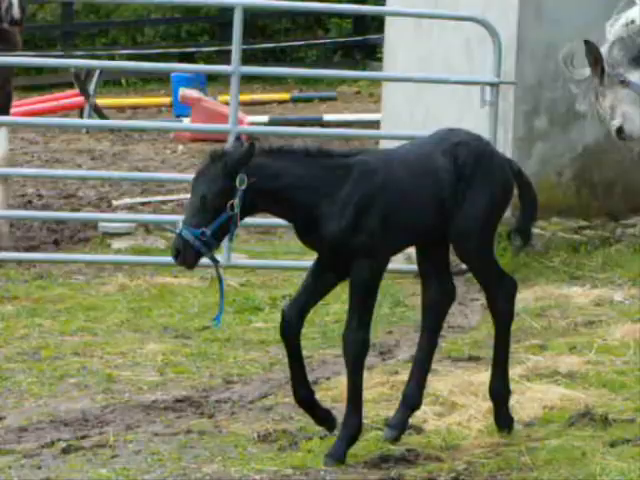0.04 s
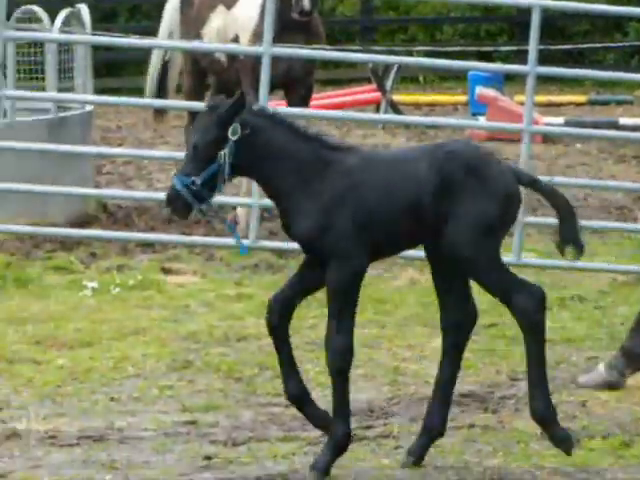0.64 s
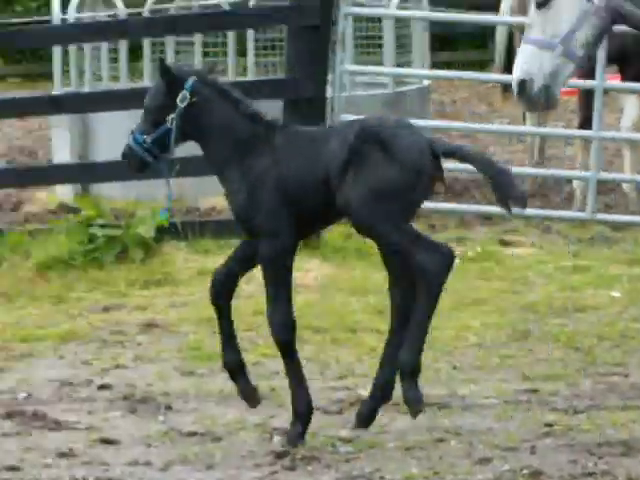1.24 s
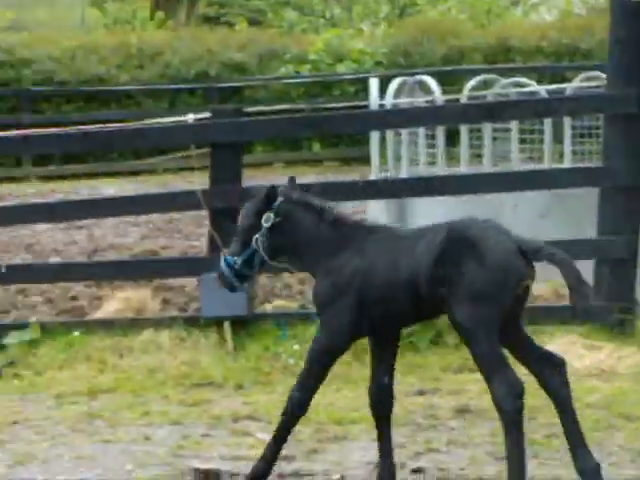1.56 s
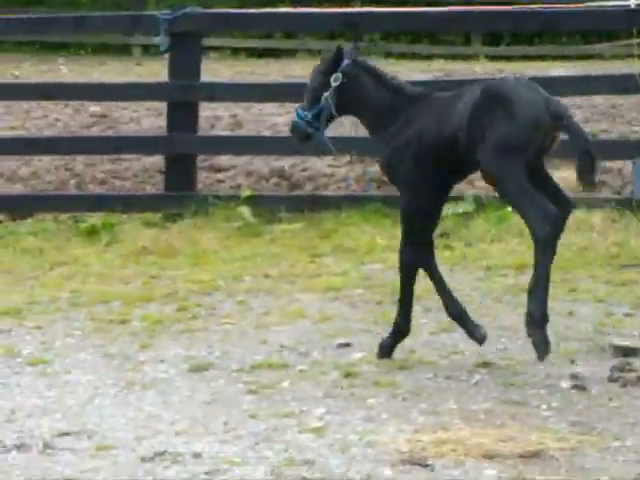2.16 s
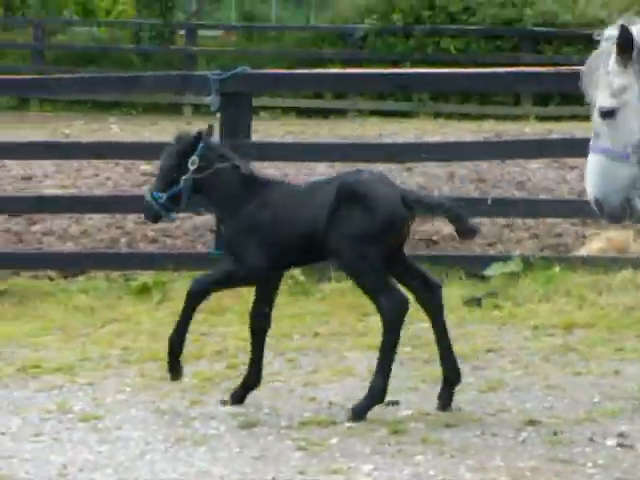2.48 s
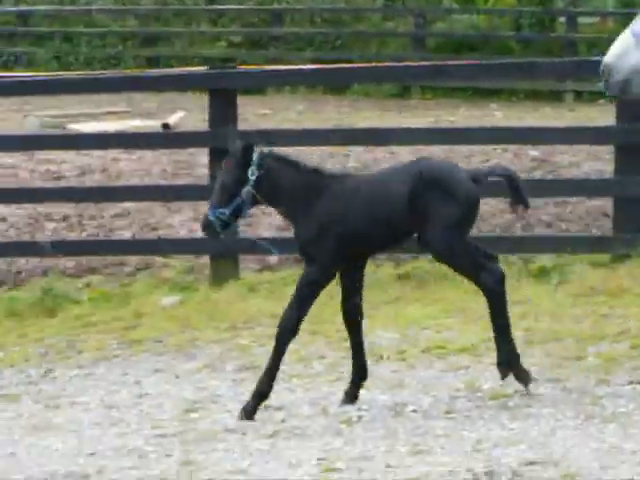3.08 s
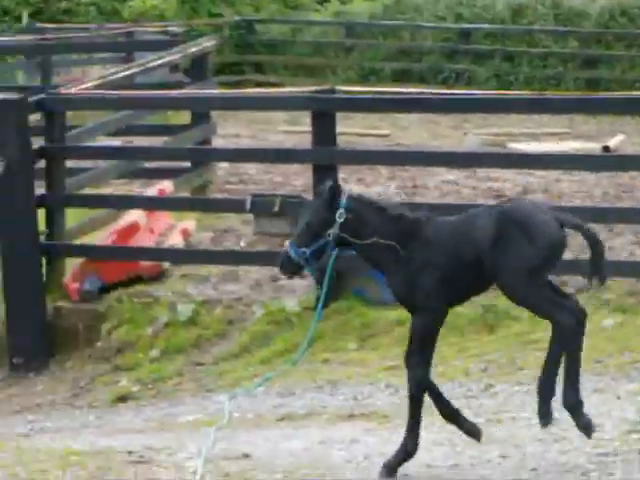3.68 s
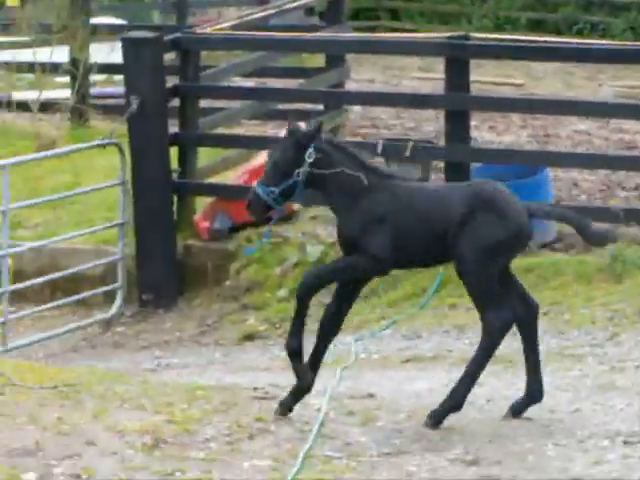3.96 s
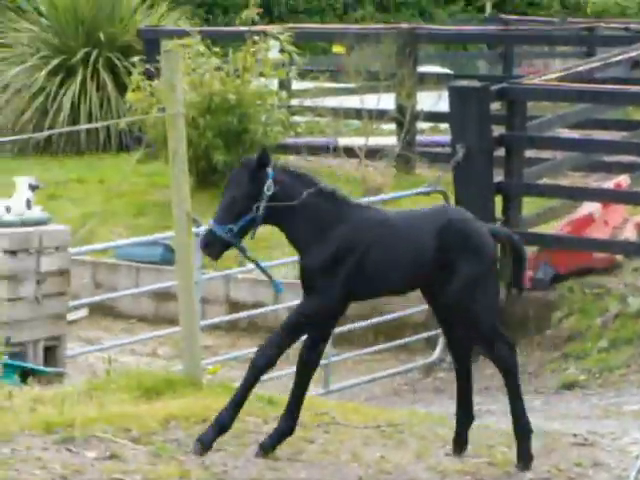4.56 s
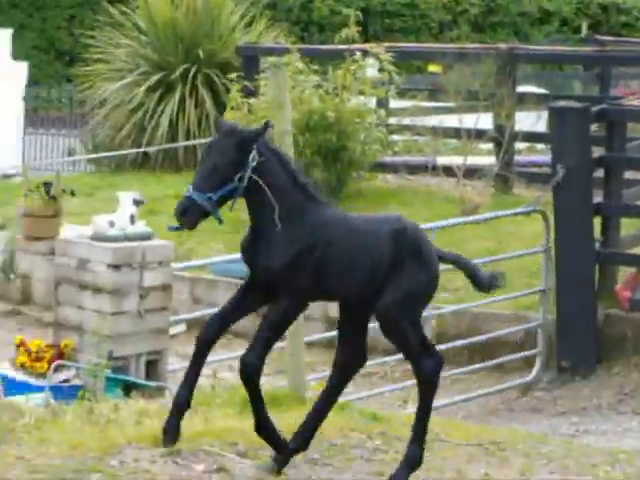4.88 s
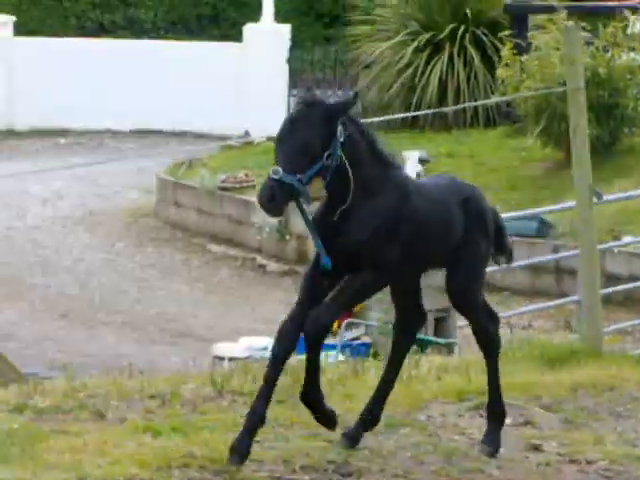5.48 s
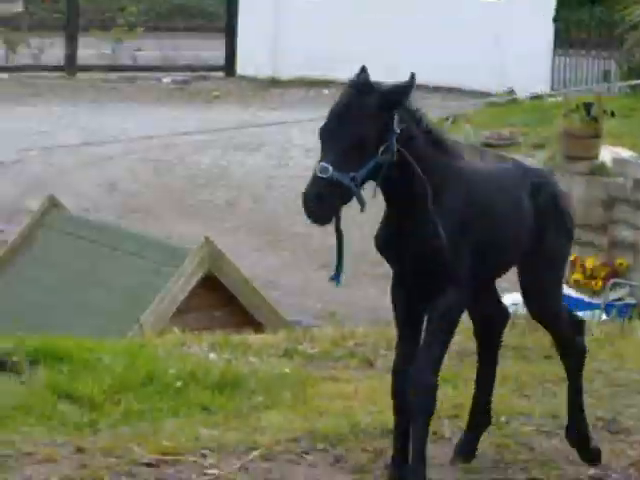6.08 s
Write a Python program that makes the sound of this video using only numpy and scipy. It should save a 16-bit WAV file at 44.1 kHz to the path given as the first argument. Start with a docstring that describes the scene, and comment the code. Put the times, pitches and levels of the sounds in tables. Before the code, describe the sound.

A foal's light, uneven hoof knocks on gravel under steady outdoor hiss, with sharp microphone handling clicks early and three faint bird chirps late.

```python
"""A foal in a gravel yard

A foal trots and canters on earth and gravel: its hooves knock, scuff and kick pebbles.
Behind it are a steady outdoor hiss and soft low rumbles; a small bird calls three times near the end.
We hear it through a small hand-held camera, which pops as it starts, clicks under the fingers,
whines faintly and samples coarsely. A fine treble fizz rises and falls with the sound."""
import sys
import numpy as np
from scipy import signal
from scipy.fft import rfft, irfft
from scipy.io import wavfile

SR = 44100
rng = np.random.default_rng(int(sys.argv[2]) if len(sys.argv) > 2 else 0)


def inscribe(sig):
    """Save sig as 16-bit PCM at rate SR to the path in sys.argv[1].

    A 1-D sig is mono; a 2-D sig holds one channel per row.
    Samples are clipped to [-1, 1] before scaling.
    """
    pcm = np.round(np.clip(np.atleast_2d(sig).T, -1, 1) * 32767)
    wavfile.write(sys.argv[1], SR, pcm.astype(np.int16))


N = 279594
TIME = np.arange(N) / SR
HOLD = 4   # the camera holds each value for this many samples

# the tone of the outdoor air, from bass to treble: f/Hz, relative level/dB
AIR_SPECTRUM = [(15, -33.5), (25, -4.5), (49, -5.5), (92, -2), (144, -1), (303, -4), (389, -4), (416, -5.5),
                (445, -5.5), (533, -5), (816, -1.5), (1280, -4), (1830, -5), (5050, -7), (5400, -7),
                (7020, -50), (11900, -120)]
# low rumbles on the microphone, from handling the camera or light wind:
# middle t/s, half length/s, level/dB, top f/Hz
LOW_RUMBLES = [(.77, .075, -37, 78), (.96, .12, -43.5, 60), (3.05, .3, -47, 45), (4.46, .08, -51, 45),
               (5.03, .12, -46, 45), (5.28, .06, -40, 45), (6.32, .07, -41, 70)]
# the notes at which the camera's plastic shell rings: f/Hz, level/dB, time to fade by 60 dB/s
SHELL_NOTES = [(1080, -26, 0.049), (1540, -16.5, .024), (1835, -20.5, 0.045), (2190, -2, 0.015),
               (2884, 2.5, 0.00597), (3220, -12, 0.0073), (4560, -14, 0.0028)]
# fingers on the camera: t/s, level/dB, ring length/times the shell's own, relative push level/dB
FINGER_TAPS = [(0.6368, -8.5, 0.83, -4.5), (0.6369, -11, 0.38, 6.5), (0.6381, 1.5, 0.943, -22),
               (0.6831, -15, 0.88, -3.5), (.6845, -26, 1.1, -22), (0.7151, -23, .6, -20),
               (3.1277, -27, .5, -20), (3.1452, -18, .8, -18)]
# bird calls: t/s, level/dB, hold/s, length/s, first f/Hz, last f/Hz, time to mid-slide/s, rasp/Hz
BIRD_CALLS = [(5.305, -32, .036, .14, 4970, 4890, .038, 210), (5.731, -33, .016, .09, 4260, 4800, .06, 360),
              (5.921, -29.5, .018, .16, 4240, 3230, .038, 50)]
# single pebbles clinking: t/s, level/dB, f/Hz
PEBBLE_CLINKS = [(2.875, -28, 3920), (3.145, -18, 3100), (3.385, -30.5, 3920), (6.264, -23, 5400),
                 (6.283, -25, 5400)]
# brief rubs, of a hoof through grit or a finger on the camera: t/s, length/s, level/dB, rough f/Hz
RUBS = [(0.315, 0.1024, -35.5, 2190), (0.703, .03, -34, 3600), (0.729, 0.11, -34.5, 3400),
        (1.893, 0.067, -42, 1500), (2.675, 0.045, -36, 1300), (2.861, 0.023, -36, 3800),
        (3.115, 0.057, -33.5, 2400), (3.38, 0.034, -35, 3800), (3.979, 0.19, -36, 1330),
        (4.305, 0.052, -36, 1190), (5.167, 0.061, -40, 1500), (5.937, 0.053, -35.5, 1300)]
# hooves landing: t/s, level/dB, knock f/Hz, relative gravel level/dB
HOOF_FALLS = [(1.509, -27, 1300, -9), (1.533, -17, 790, -14), (1.911, -22.5, 850, -9.5),
              (2.282, -32, 1400, -1), (2.674, -15, 770, -16), (2.683, -22.5, 760, -14),
              (3.097, -26.5, 950, -8), (3.287, -18, 790, -28), (3.553, -18.5, 880, -9),
              (3.992, -21.5, 1130, -14), (4.321, -25.5, 1090, -15), (4.807, -19, 1085, -11.5),
              (4.953, -23.5, 1075, -6), (5.166, -26, 940, -7.5), (5.194, -19, 1100, -8),
              (5.578, -24.5, 633, -8), (5.965, -19, 882, -10), (6.266, -20, 647, -8.5)]


def from_db(db):
    """Turn decibels into a number to multiply by."""
    return 10 ** (np.asarray(db) / 20)


def rms_one(x):
    """Scale a sound so that its average strength (rms) is 1."""
    return x / np.sqrt(np.mean(x ** 2) + 1e-20)


def keep_range(x, hz, kind, order=2):
    """Keep what lies below a frequency ("low") or between two ("band")."""
    return signal.sosfilt(signal.butter(order, hz, kind, fs=SR, output="sos"), x + 1e-18)


def noise(hz, kind, size=N):
    """Filtered noise of strength 1."""
    return rms_one(keep_range(rng.standard_normal(size), hz, kind))


def add(out, start_s, sound):
    """Mix a sound in at the given time."""
    at = max(round(start_s * SR), 0)
    out[at:at + len(sound)] += sound[:max(N - at, 0)]


def ring(t, hz, fade_s):
    """A struck object rings at one pitch, dropping 60 dB in fade_s."""
    return np.sin(2 * np.pi * hz * t) * np.exp(-np.log(1000) * t / fade_s)


def push(t, peak_s):
    """A contact force that rises to 1 and lets go."""
    return t / peak_s * np.exp(1 - t / peak_s)


def grit(size, per_s):
    """Stones touch at random, making clicks of uneven size."""
    return rms_one(rng.standard_normal(size) * (rng.random(size) < per_s / SR))


def yard_echo(x, fade_s, echo_db):
    """Walls, fences and hedges scatter the sound, adding a short tail."""
    t = TIME[:SR // 2]
    tail = rng.standard_normal(len(t)) * from_db(-60 * t / fade_s) * (1 - np.exp(-t / 0.0057))
    tail /= np.sqrt(np.sum(tail ** 2))
    return x + from_db(echo_db) * signal.fftconvolve(x, tail)[:N]


def outdoor_air(level_db=-35.9, fade_db_per_s=.16):
    """A broad outdoor rush that slowly eases."""
    hz, db = np.transpose(AIR_SPECTRUM)
    every_hz = np.arange(N // 2 + 1) * SR / N
    gain = from_db(np.interp(np.log(every_hz + 1), np.log(hz), db))
    rush = rms_one(irfft(rfft(rng.standard_normal(N)) * gain, N))
    return from_db(level_db - fade_db_per_s * TIME) * rush


def camera_noise(hiss_db=-46, whine_db=-52, whine_hz=5012, wander_hz=5.94):
    """The microphone's own hiss and the camera's thin, wavering whine."""
    hiss = from_db(hiss_db) * noise([3500, 7000], "band")
    hz = whine_hz + wander_hz * noise(19.4, "low")
    whine = np.sqrt(2) * from_db(whine_db) * np.sin(2 * np.pi * np.cumsum(hz) / SR)
    return hiss + whine


def rumbles(lowest_hz=16, lull_top_hz=62, lull_db=-57.5):
    """Handling the camera or light wind makes the microphone rumble; each rumble swells and fades."""
    out = from_db(lull_db) * noise([lowest_hz, lull_top_hz], "band")
    for middle_s, half_s, db, top_hz in LOW_RUMBLES:
        swell = np.exp(-((TIME - middle_s) / half_s) ** 2)
        out += from_db(db) * swell * noise([lowest_hz, top_hz], "band")
    return out


def switch_on(x, on_s=.0748, awake_s=.131, muted_db=-6.0, pop_db=-3, sag_db=-18, settle_s=0.0056):
    """The camera's input opens with a pop, settles, and reaches full level a moment later."""
    out = x * (TIME > on_s) * from_db(muted_db * (TIME < awake_s))
    add(out, on_s, from_db(pop_db) * np.ones(HOLD))
    add(out, on_s, -from_db(sag_db) * np.exp(-TIME[:SR // 8] / settle_s))
    return out


def camera_taps(push_s=0.00018, snap_db=-9.5, snap_s=0.00174):
    """A finger hits the camera's shell: a push, a snap and the ring of the plastic."""
    out, t = np.zeros(N), TIME[:SR // 10]
    for start_s, db, ring_length, push_db in FINGER_TAPS:
        shell = sum(from_db(level) * ring(t, hz, fade_s * ring_length)
                    for hz, level, fade_s in SHELL_NOTES)
        snap = from_db(snap_db) * rng.standard_normal(len(t)) * np.exp(-t / snap_s)
        add(out, start_s, from_db(db) * (shell + from_db(push_db) * push(t, push_s) + snap))
    return out


def bird(rise_s=.026, fade_db_per_s=290, linger_db=-13, end_s=.03, slide_s=.019, waver_hz=45):
    """A thin whistle swells, holds and fades as it slides in pitch; it is raspiest in mid-slide."""
    out, t = np.zeros(N), TIME[:SR // 4]
    for start_s, db, hold_s, length_s, first_hz, last_hz, middle_s, rasp_hz in BIRD_CALLS:
        fade_db = np.clip(-fade_db_per_s * (t - rise_s - hold_s), linger_db, 0)
        soft_ends = np.clip(np.minimum(t / rise_s, (length_s - t) / end_s), 0, 1)
        slide = np.tanh((t - middle_s) / slide_s)   # moves from near -1 towards +1
        hz = first_hz + (last_hz - first_hz) * (1 + slide) / 2
        waver = (waver_hz + rasp_hz * (1 - slide ** 2)) * noise(353, "low", len(t))
        whistle = np.sqrt(2) * np.sin(2 * np.pi * np.cumsum(hz + waver) / SR)
        add(out, start_s, from_db(db + fade_db) * soft_ends * whistle)
    return out


def loose_gravel(level_db=-49):
    """Stray pebbles tick at random all the way through."""
    return from_db(level_db) * rms_one(keep_range(grit(N, per_s=110), [900, 5000], "band"))


def clinks(fade_s=0.016):
    """A kicked pebble strikes another and rings very briefly."""
    out = np.zeros(N)
    for start_s, db, hz in PEBBLE_CLINKS:
        add(out, start_s, from_db(db) * ring(TIME[:SR // 20], hz, fade_s))
    return out


def scuffs():
    """A hoof slides over small stones, or a finger rubs the camera: tiny clicks swell and fade."""
    out = np.zeros(N)
    for start_s, length_s, db, hz in RUBS:
        progress = np.linspace(0, 1, int(length_s * SR))
        scrape = keep_range(grit(len(progress), per_s=2300), [hz / 2.2, hz * 1.34], "band", order=1)
        add(out, start_s, from_db(db) * rms_one(scrape) * np.sin(np.pi * progress ** .7))
    return out


def hooves(knock_db=1.5, knock_s=0.014, crack_db=-2.0, crack_s=0.0021, spray_db=-12.5, spray_s=0.029):
    """Each hoof gives a hollow knock and a crunch of stones, then loose grit settles."""
    out, t = np.zeros(N), TIME[:SR // 8]
    for start_s, db, hz, gravel_db in HOOF_FALLS:
        knock = from_db(knock_db) * ring(t, hz, knock_s) * (1 - np.exp(-t / 0.00059))
        crunch_shape = from_db(crack_db) * push(t, crack_s) + from_db(spray_db) * np.exp(-t / spray_s)
        stones = rms_one(keep_range(grit(len(t), per_s=12000), [500, 4000], "band"))
        add(out, start_s, from_db(db) * (knock + from_db(gravel_db) * stones * crunch_shape))
    return out


def scene():
    """Foal, bird and finger taps echo in the yard, over the air and the camera's own noise."""
    foal = yard_echo(hooves() + scuffs() + clinks() + loose_gravel(), fade_s=.17, echo_db=-8)
    calls = yard_echo(bird(), fade_s=.37, echo_db=-6)
    taps = yard_echo(camera_taps(), fade_s=0.17, echo_db=-22)
    return (foal + calls + taps + outdoor_air() + camera_noise() + rumbles())[None]


def record(dry, fizz=0.33, soften_hz=17300, cutoff_hz=15680):
    """The camera holds each value as a flat step, which mirrors the sound into the treble."""
    dulled = keep_range(dry[0], SR / HOLD / 2, "low", order=12)
    samples = np.clip(switch_on(dulled)[::HOLD], -1, 1)
    steps = np.repeat(samples, HOLD)
    # a fine treble fizz that rises and falls with the sound
    steps[::HOLD] += fizz * rng.standard_normal(len(samples)) * np.diff(samples, prepend=0)
    rounded = keep_range(steps[:N], soften_hz, "low", order=1)
    steep_treble_cut = signal.ellip(10, .1, 70, cutoff_hz, fs=SR, output="sos")
    return signal.sosfilt(steep_treble_cut, rounded)[None]


dry = scene()
out = record(dry)
inscribe(out)
```